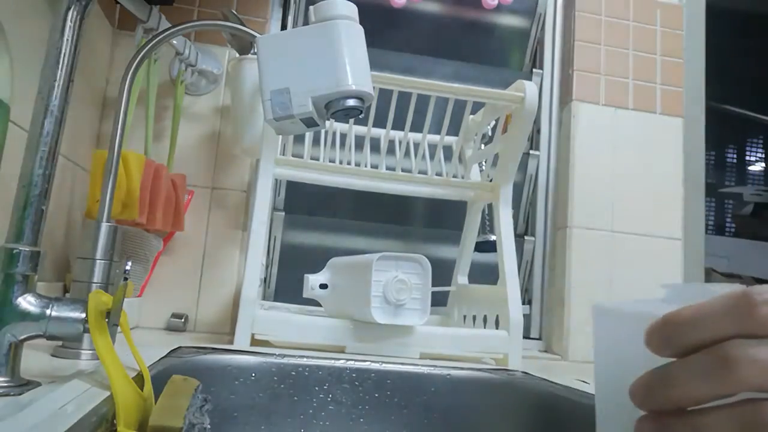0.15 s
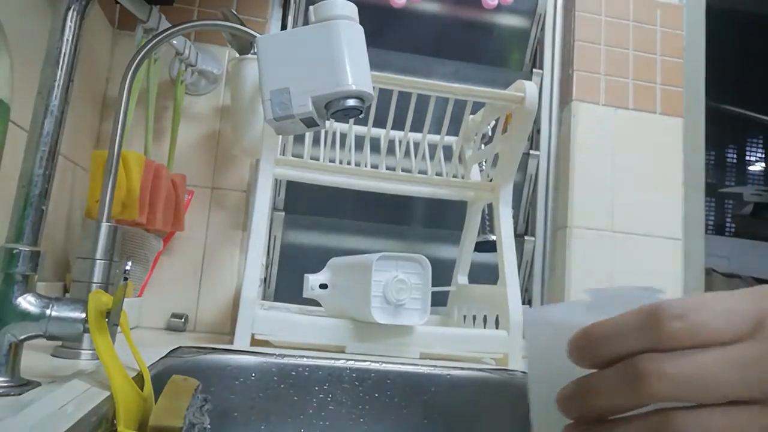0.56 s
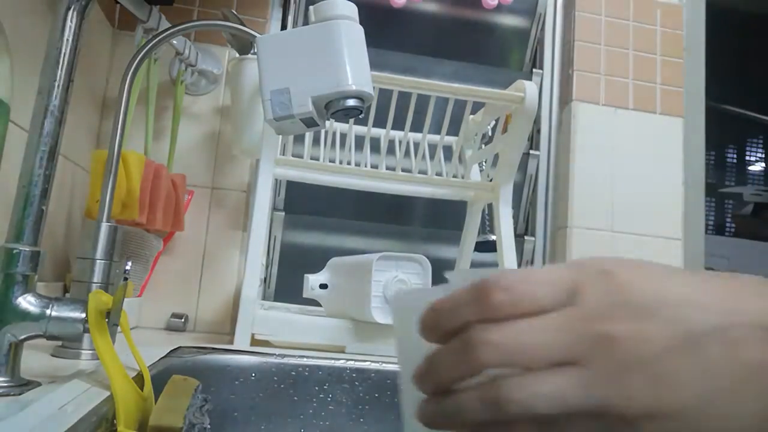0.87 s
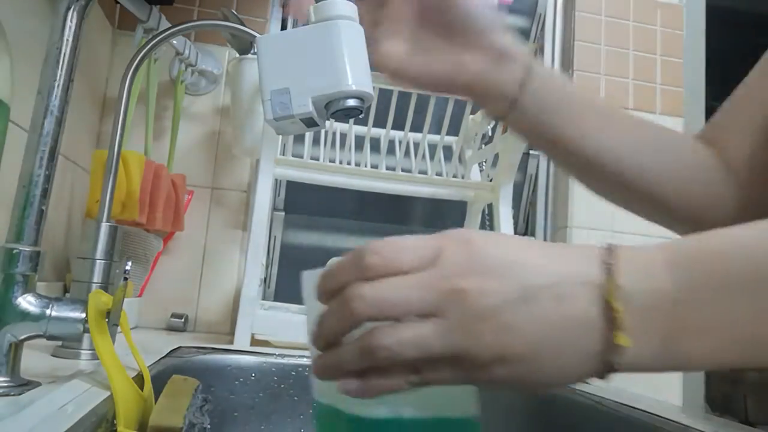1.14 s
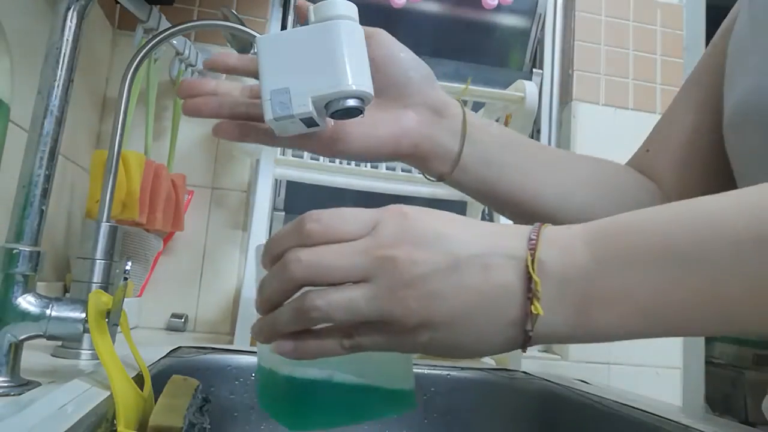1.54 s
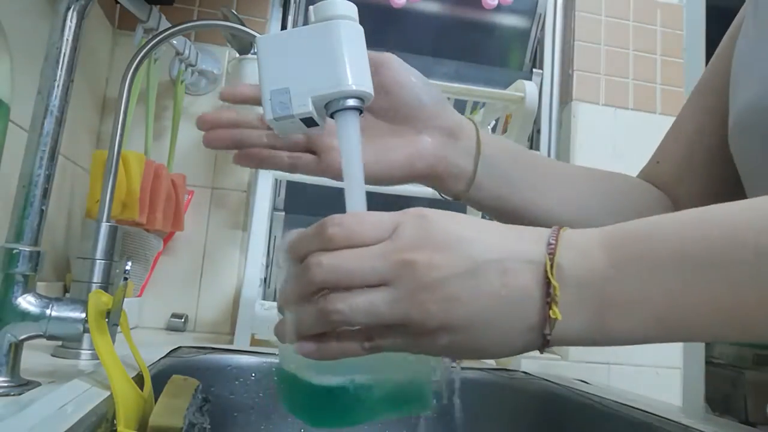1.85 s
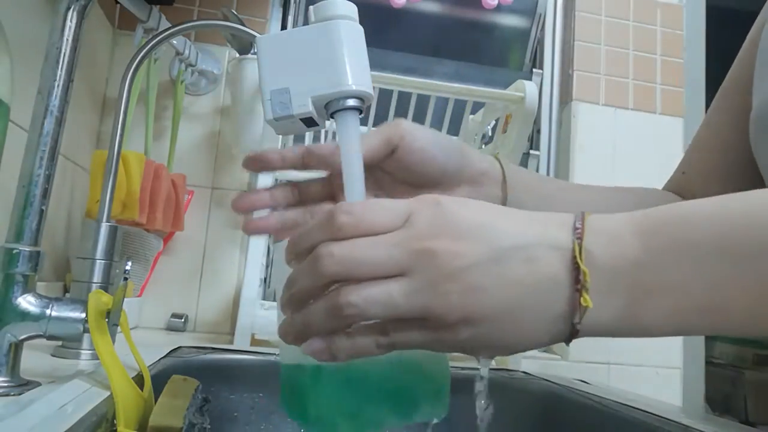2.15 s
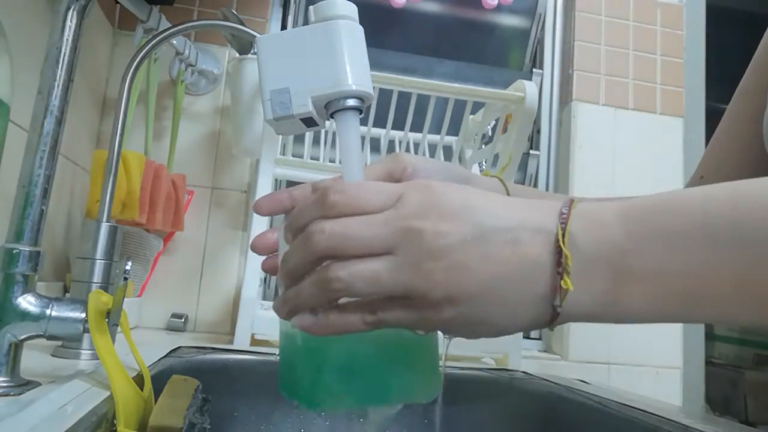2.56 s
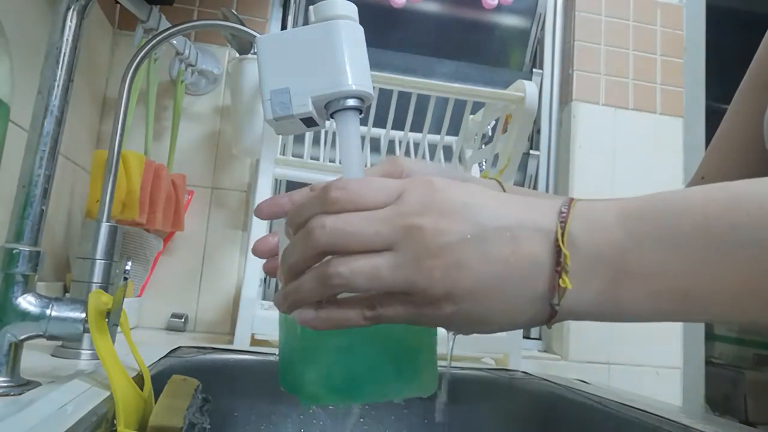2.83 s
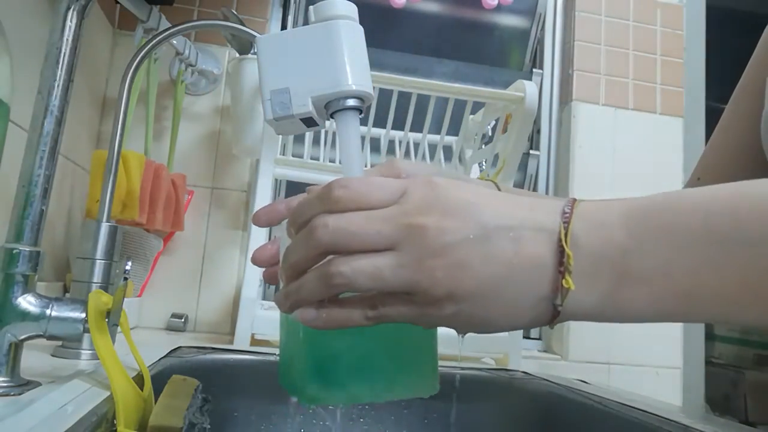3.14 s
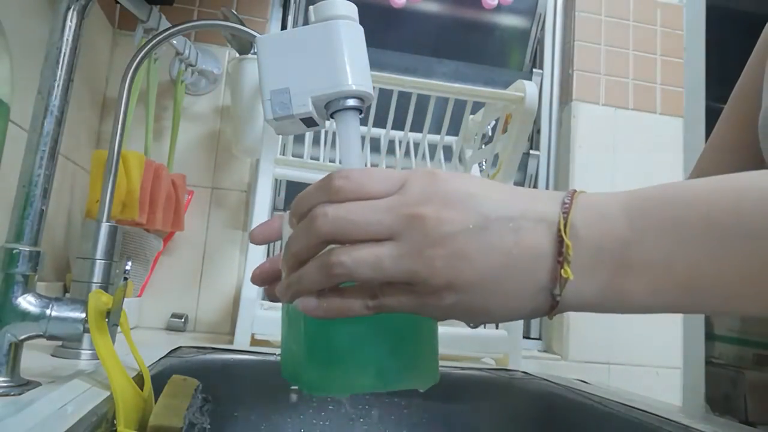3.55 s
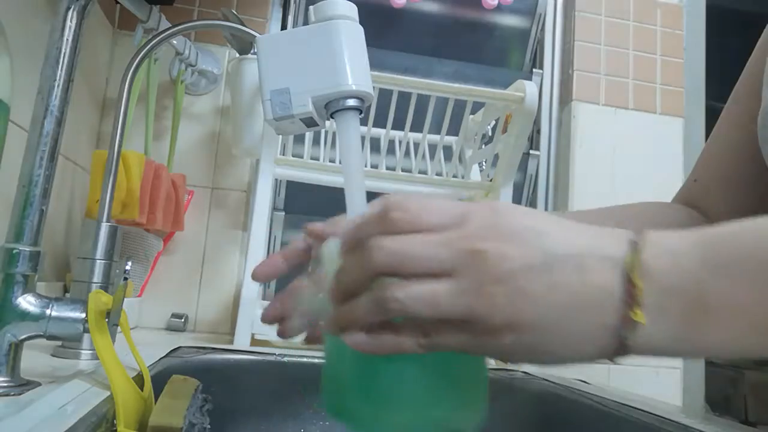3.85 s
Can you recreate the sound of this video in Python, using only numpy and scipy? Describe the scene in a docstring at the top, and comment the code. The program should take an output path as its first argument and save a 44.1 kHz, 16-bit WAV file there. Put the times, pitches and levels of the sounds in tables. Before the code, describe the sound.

After low room rumble and a few dull handling bumps with clinks, a tap clicks open and a bright, steady water jet runs to the end, with overflow humming in the basin; close stereo, louder on the left.

```python
"""A small tiled kitchen in stereo, its low rumble swelling unevenly; the left microphone port faces the steel sink.
A cup is knocked, a light tap follows, then a tub is set down with clinks and a clack: rough contacts ring
sets of modes while pushes shake the counter. A sleeve brushes by as a swish of filtered noise.
The tap valve clicks open and a thud runs through the pipe. Dense drop impacts make the aerated jet hiss
into the tub, and the overflow hums in the basin. The right port hears it all a little later."""
import sys
import numpy as np
from scipy import signal
from scipy.fft import rfft, irfft
from scipy.io import wavfile

SR = 44100
rng = np.random.default_rng(int(sys.argv[2]) if len(sys.argv) > 2 else 0)


def persist_wave(psi):
    """Save psi, clipped to +-1, as 16-bit WAV."""
    counts = np.round(np.clip(psi, -1, 1) * 32767).astype(np.int16)
    wavfile.write(sys.argv[1], SR, np.atleast_2d(counts).T)


N = 176400   # 4 s

# curve of the room swells, relative to the room colours: time_s, deep_rumble_db, upper_rumble_db, air_db
ROOM_SWELLS = [(0, 13.5, 0.5, 3.5), (.1, 1, 1.5, -1.5), (.68, 8.5, 2.5, 4), (.76, -1, 11.5, 6.5),
               (.97, 8, 6.5, 3.5), (1.25, 2, 3, 1), (1.7, 2, -4.5, 0), (1.8, 12.5, -1.5, 7),
               (2.35, 1.5, -3, -19), (2.5, 11, 2.5, 7), (3.6, 7.5, -1.5, 1), (4, 8.5, -4, -31)]
# rumble colour, the same at both ports: pitch_hz, density_db [dB per Hz]
RUMBLE_COLOUR = [(20, -68.5), (40, -69.5), (70, -75), (90, -67), (108, -61.5), (130, -66.5), (160, -71),
                 (200, -77), (300, -87.5), (400, -100)]
# room air at the left port: pitch_hz, density_db [dB per Hz]
AIR_LEFT = [(300, -85.5), (400, -99), (600, -99.5), (800, -102), (1100, -100), (1400, -99), (1700, -93),
            (2000, -100), (2500, -107), (3500, -105), (5000, -114), (7500, -114), (10000, -122),
            (15000, -123)]
# room air at the right port: pitch_hz, density_db [dB per Hz], likeness_to_left [0-1]
AIR_RIGHT = [(298, -95, 0.85), (400, -102.5, .7), (585, -106, 0), (2000, -105, 0.1), (3300, -112, 0),
             (7400, -119, 0), (15000, -124, 0)]
RUMBLE_FLICKER_DB, RUMBLE_SPLIT_HZ = 1.2, 60

# a sleeve brushes by: start_s, length_s, level_db [gain on the noise before its port gain]
SLEEVE = [(1.21, 0.26, -68)]
SLEEVE_BAND_HZ, SLEEVE_LEFT_GAIN_DB = (6850, 9900), 12

# pushes that shake the counter: start_s, deep_mode_db, upper_mode_db
COUNTER_PUSHES = [(0.367, -24.5, -27.5), (0.383, -29, -18.5), (0.43, -19.5, -26), (0.787, -40, -43),
                  (.812, -21, -19), (0.85, -20.5, -40), (0.877, -32, -28.5), (1.017, -46, -23),
                  (1.059, -21, -21), (1.088, -22.5, -20), (1.138, -31, -26.5)]
# low modes of the counter: pitch_hz, t60_s
COUNTER_MODES = [(62, 0.11), (112, 0.16)]
# water hammer as the valve opens: start_s, level_db
PIPE_HAMMER = [(1.7335, -35), (1.7408, -21.5), (1.7488, -28)]
# mode of the pipe: pitch_hz, t60_s
PIPE_MODES = [(124, 0.22)]
PUSH_HZ = 280   # softness of a push: corner of its two-pole low-pass

# contacts, one table per set of modes rung, all with these columns: start_s, contact_s, ring_db,
# scuff_low_db, scuff_middle_db, scuff_treble_db, decay_s [60 dB fall after contact], left_over_right_db
CUP_CONTACTS = [(.3603, 0.0024, -60, -56, -57, -55.5, 0.012, 3),
                (.361, .012, -38, -50.5, -63, -79, 0.27, 6)]
TAP_CONTACTS = [(.603, 0.022, -52.5, -59, -90, -82, .06, 6.7)]   # a light tap
TUB_CONTACTS = [(.775, 0.025, -30, -34, -39, -43.5, 0.18, 4.8)]
CLINK_CONTACTS = [(.975, 0.041, -76, -77, -63, -65.5, 0.12, 2.3), (1.0, 0.04, -76, -79, -66, -51, 0.17, 4),
                  (1.0228, 0.0043, -33, -57, -68, -58, 0.18, 3.6)]
CLACK_CONTACTS = [(1.0285, 0.0065, -35, -49, -48, -54, 0.27, 4.6)]
VALVE_CONTACTS = [(1.7304, .003, -39, -75, -64, -42, .012, 10)]
# sets of modes those contacts ring, all with these columns: pitch_hz, level_db [relative], t60_s
CUP_MODES = [(401, -1.5, 0.21), (478, 11.5, 0.028), (878, 0, 0.072), (1716, 8, 0.02), (2200, -1.5, 0.02)]
TAP_MODES = [(472, 0, 0.054), (920, -9.5, 0.069)]
TUB_MODES = [(395, 7, 0.076), (665, -2, 0.059), (1108, 5.5, 0.033), (1686, 12, 0.024), (1875, 1, 0.074),
             (2750, -4, 0.031), (3550, -13, 0.07)]
CLINK_MODES = [(1930, 0, 0.022), (3970, -1, 0.016)]
CLACK_MODES = [(620, 3, 0.03), (2060, -1, 0.018), (2350, 2, 0.022), (3900, -5, 0.011)]
VALVE_CLICK_MODES = [(2680, 2, .011), (6000, -3, .002), (10800, 0, .0015)]
SCUFF_EDGES_HZ = 200, 1300, 4200, 10000
KNOCK_LIKENESS = 0.47   # share of noise power common to both ports
CHATTER_DB, CHATTER_HZ = 4, 250   # uneven grip of a contact
ATTACK_SHARE, RATTLE_DB = .4, -16   # rise as a share of the contact; level of the after-rattle

# curve of the overflow drumming on the basin: time_s, level_db
OVERFLOW = [(1.8, -59), (1.95, -62), (2.14, -51), (2.26, -55), (2.4, -49), (2.52, -46), (2.62, -51),
            (2.85, -51), (3.37, -57), (4, -60)]
# low modes of the steel basin: pitch_hz, width_hz, level_db [relative]
BASIN_MODES = [(197, 83, -4.5), (240.4, 30.5, -2.5), (296, 59, 1.5), (370, 74, -4)]

# curve of the jet's flow, relative to its colours: time_s, level_db, extra_middle_db
JET_FLOW = [(1.73, -38, 0), (1.742, -12, 0), (1.764, -8.5, 1), (1.773, 0.5, 0.5), (1.9, 3, 1.5),
            (2.15, 4, 0), (2.36, 2.5, 3.5), (2.45, -0.5, 0.5), (2.7, -1, 1.5), (4, -1, 1)]
# jet colour at the left port before the flow: pitch_hz, density_db [dB per Hz]
JET_LEFT = [(350, -88.5), (450, -84), (560, -87), (700, -75), (790, -81), (1250, -74.5), (1380, -79.5),
            (1640, -64.5), (1800, -72.5), (2040, -69.5), (2350, -84), (2750, -74.5), (3100, -85),
            (3800, -77), (4650, -81), (5150, -84), (5400, -72.5), (6100, -73), (6480, -69), (6760, -79),
            (7040, -65.5), (7230, -77.5), (7480, -67), (7850, -68), (8250, -81.5), (8750, -71), (9500, -75),
            (10300, -88.5), (11700, -84), (13000, -86), (15000, -86.5)]
# jet colour at the right port before the flow: pitch_hz, density_db [dB per Hz], likeness_to_left [0-1]
JET_AT_RIGHT = [(350, -84, .9), (560, -92, .8), (700, -83, .9), (1350, -92, .6), (1630, -77, .85),
                (2000, -80, .8), (2800, -89, .55), (3500, -85, .6), (5000, -84, .6), (7000, -85, .55),
                (9200, -82, .5), (11500, -88, .35), (15000, -98, .4)]
MIDDLE_HZ = 2500, 5000
DROPS_PER_S, DROP_SPREAD_DB = 15000, 0.5
JET_FLICKER_DB, JET_SHARED_DB = 0.54, 0.93   # per half octave; of the whole jet

WALLS_DB, WALLS_T60_S, WALLS_LOW_HZ = -7.5, 0.13, 930   # echoes against the direct sound
RIGHT_LAG_S, BASS_LAG_S, BASS_TOP_HZ = .00059, .00039, 300
CUTOFF_HZ = 15350


def amp(db):
    """Decibels as a factor of amplitude."""
    return 10 ** (np.asarray(db) / 20)


def in_time(rows):
    """Columns joined by straight lines over time."""
    s, *columns = np.transpose(rows)
    return [np.interp(np.arange(N) / SR, s, c) for c in columns]


def level_at(table):
    """Columns of a table read at every bin on a log-frequency axis."""
    at, *columns = np.transpose(table)
    log_hz = np.log(np.maximum(np.arange(N // 2 + 1) * SR / N, 1))
    return [np.interp(log_hz, np.log(at), c) for c in columns]


def band(x, lo_hz, hi_hz):
    """Band-pass with gentle slopes."""
    return signal.sosfilt(signal.butter(2, [lo_hz, hi_hz], "band", fs=SR, output="sos"), x)


def drift(rate_hz):
    """Slow chance of spread 1: noise through a two-pole low-pass, made at every 40th sample."""
    r = np.exp(-80 * np.pi * rate_hz / SR)
    slow = signal.lfilter([1], [1, -2 * r, r * r], rng.standard_normal(N // 40 + 1002))
    slow = slow[1000:]   # leave out the filter's start
    return np.interp(np.arange(N) / 40, np.arange(len(slow)), slow / slow.std())


def ring(x, hz, t60):
    """A unit click sets a dying sine of starting height 1 ringing."""
    r, w = amp(-60 / (t60 * SR)), 2 * np.pi * hz / SR
    return signal.lfilter([0, np.sin(w)], [1, -2 * r * np.cos(w), r * r], x + 1e-18)


def coloured(sources, left, right):
    """Spectra of two unit noises: left hears the first, right a blend of both; each has its colour."""
    (left_db,), (right_db, alike) = level_at(left), level_at(right)
    alike = np.clip(alike, 0, 1)
    first, second = rfft(sources)
    blend = alike * first + np.sqrt(1 - alike ** 2) * second
    return np.array([first, blend]) * amp([left_db, right_db]) * np.sqrt(SR / 2)


def part(spectrum, lo_hz, hi_hz):
    """The sound of one slice of a spectrum, with soft edges that add up to the whole."""
    octave = np.log2(np.maximum(np.arange(N // 2 + 1) * SR / N, 1))
    edge = lambda at: np.clip(.5 + 4 * (octave - np.log2(at)), 0, 1)
    return irfft(spectrum * (edge(lo_hz) - edge(hi_hz)), N)


def room():
    """Low rumble in uneven swells, alike at both ports, under a faint air that rises and falls."""
    deep_db, upper_db, air_db = in_time(ROOM_SWELLS)
    rumble = rfft(rng.standard_normal(N)) * amp(level_at(RUMBLE_COLOUR)[0]) * np.sqrt(SR / 2)
    deep = part(rumble, 12, RUMBLE_SPLIT_HZ) * amp(deep_db + RUMBLE_FLICKER_DB * drift(1.6))
    upper = part(rumble, RUMBLE_SPLIT_HZ, 630) * amp(upper_db + RUMBLE_FLICKER_DB * drift(4.4))
    air = coloured(rng.standard_normal((2, N)), AIR_LEFT, AIR_RIGHT)
    return deep + upper + part(air, 305, 20000) * amp(air_db)


def sleeve():
    """Brushing cloth: a faint bright noise that swells, fades and flickers, stronger at the left port."""
    t = np.arange(N) / SR
    shape = 0
    for s, length, db in SLEEVE:
        shape = shape + amp(db) * np.sin(np.pi * np.clip((t - s) / length, 0, 1)) ** 2
    swish = band(band(rng.standard_normal((2, N)), *SLEEVE_BAND_HZ), *SLEEVE_BAND_HZ)
    return shape * amp(CHATTER_DB / 2 * drift(17)) * swish * amp([[SLEEVE_LEFT_GAIN_DB], [0]])


def thuds(pushes, modes):
    """Soft pushes set the low modes of a heavy body swinging."""
    s, *levels = np.transpose(pushes)
    out, r = 0, np.exp(-2 * np.pi * PUSH_HZ / SR)
    for db, (hz, t60) in zip(levels, modes):
        clicks = np.zeros(N)
        clicks[(s * SR).astype(int)] = amp(db)
        push = signal.lfilter([(1 - r) ** 2], [1, -2 * r, r * r], clicks + 1e-18)
        out = out + ring(push, hz, t60)
    return out


def knocks(contacts, modes):
    """A short rough contact and its after-rattle ring a set of modes; a three-band scuff dies away."""
    out = np.zeros((2, N))
    t = np.arange(SR // 2) / SR
    for s, length, ring_db, *scuff_db, decay, pan_db in contacts:
        shared, *own = rng.standard_normal((3, len(t)))
        noise = np.sqrt(KNOCK_LIKENESS) * shared + np.sqrt(1 - KNOCK_LIKENESS) * np.array(own)
        noise = noise * amp(CHATTER_DB * drift(CHATTER_HZ)[:len(t)])
        rise = np.minimum(t / (ATTACK_SHARE * length), 1)
        noise = noise * rise * amp(-60 * np.maximum(t - length, 0) / decay)
        force = noise * np.where(t < length, 1, amp(RATTLE_DB))
        rings = sum(amp(db) * band(ring(force, hz, t60), hz / 2, 2 * hz) for hz, db, t60 in modes)
        # ring_db is the level over the contact and the 10 ms after it, before the left-right balance
        rings = amp(ring_db) * rings / rings[:, :int((length + .01) * SR)].std()
        scuff = 0
        for db, lo, hi in zip(scuff_db, SCUFF_EDGES_HZ, SCUFF_EDGES_HZ[1:]):
            rub = band(band(noise, lo, hi), lo / 2, min(2 * hi, 18000))
            scuff = scuff + amp(db) * rub * np.sqrt(SR / 2 / (hi - lo))
        i = int(s * SR)
        out[:, i:i + len(t)] += (rings + scuff) * amp([[pan_db / 2], [-pan_db / 2]])
    return out


def basin():
    """Falling water, as flickering noise, keeps the steel basin's low modes humming."""
    noise = rng.standard_normal(N) * amp(1.5 * drift(20))
    hum = sum(amp(db) * band(noise, hz - width / 2, hz + width / 2) for hz, width, db in BASIN_MODES)
    level_db, = in_time([(OVERFLOW[0][0] - .05, -90)] + list(OVERFLOW))
    hum = band(hum, 155, 347)
    return hum / hum.std() * amp(level_db)


def jet():
    """Dense tiny drop impacts; each half octave flickers, the whole follows the flow."""
    level_db, middle_db = in_time(JET_FLOW)
    hits = rng.random((2, N)) < DROPS_PER_S / SR
    sizes = rng.standard_normal((2, N)) * amp(DROP_SPREAD_DB * rng.exponential(1, (2, N)))
    drops = hits * sizes
    spectrum = coloured(drops / drops.std(), JET_LEFT, JET_AT_RIGHT)
    shared_db, out = JET_SHARED_DB * drift(31), 0
    edges_hz = 300 * 2 ** np.arange(0, 6.1, .5)
    for lo, hi in zip(edges_hz, edges_hz[1:]):
        extra_db = middle_db * (MIDDLE_HZ[0] < np.sqrt(lo * hi) < MIDDLE_HZ[1])
        out = out + part(spectrum, lo, hi) * amp(extra_db + JET_FLICKER_DB * drift(24))
    is_open = np.arange(N) > JET_FLOW[0][0] * SR
    return out * amp(level_db + shared_db) * is_open


def walls(x):
    """Direct sound plus a short dense wash of echoes off basin and tiles, its own at each port."""
    t = np.arange(SR // 4) / SR
    echoes = band(rng.standard_normal((2, len(t))), WALLS_LOW_HZ, 22000)
    echoes = echoes * amp(-60 * t / WALLS_T60_S) * (t > .002)
    echoes = amp(WALLS_DB) * echoes / np.sqrt(np.sum(echoes ** 2, axis=1, keepdims=True))
    return x + signal.fftconvolve(x, echoes, axes=1)[:, :N]


def scene():
    """Jet and contacts echo off the walls; rumble, sleeve, thuds and basin hum are added without echoes."""
    background = room() + sleeve()
    heavy = thuds(COUNTER_PUSHES, COUNTER_MODES) + thuds(PIPE_HAMMER, PIPE_MODES)
    hits = knocks(CUP_CONTACTS, CUP_MODES) + knocks(TAP_CONTACTS, TAP_MODES)
    hits = hits + knocks(TUB_CONTACTS, TUB_MODES) + knocks(CLINK_CONTACTS, CLINK_MODES)
    hits = hits + knocks(CLACK_CONTACTS, CLACK_MODES) + knocks(VALVE_CONTACTS, VALVE_CLICK_MODES)
    return background + heavy + basin() + walls(jet() + hits)


def record(dry):
    """The right port hears everything a little later, the bass less so; the top is cut."""
    left, right = dry
    treble = part(rfft(right), BASS_TOP_HZ, SR)
    bass = right - treble
    late = np.roll(treble, round(RIGHT_LAG_S * SR)) + np.roll(bass, round(BASS_LAG_S * SR))
    top_cut = signal.cheby2(28, 60, CUTOFF_HZ, fs=SR, output="sos")
    return signal.sosfilt(top_cut, np.array([left, late]))


dry = scene()
out = record(dry)
persist_wave(out)
```